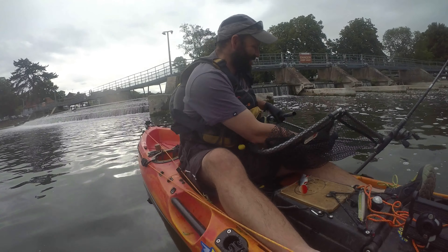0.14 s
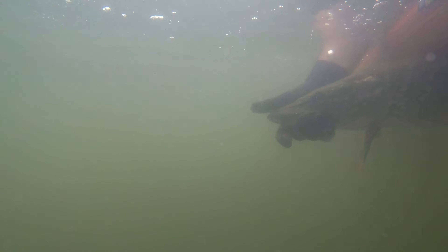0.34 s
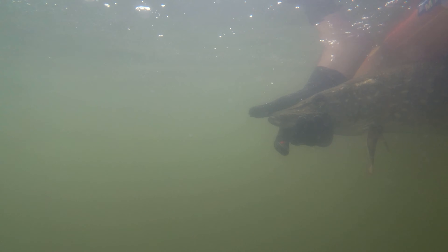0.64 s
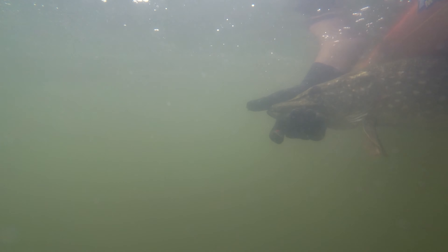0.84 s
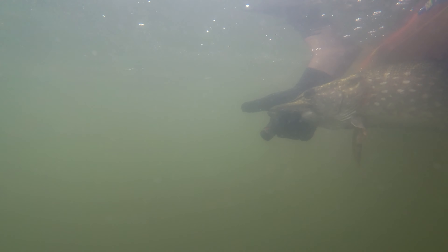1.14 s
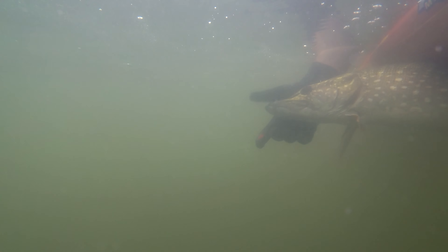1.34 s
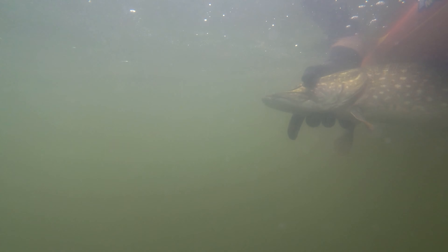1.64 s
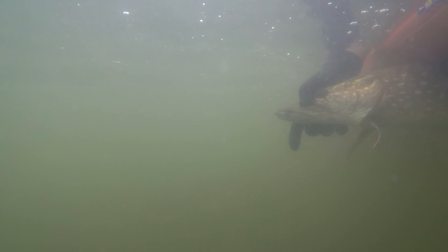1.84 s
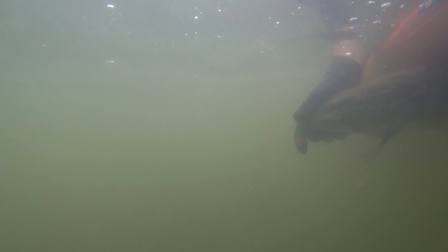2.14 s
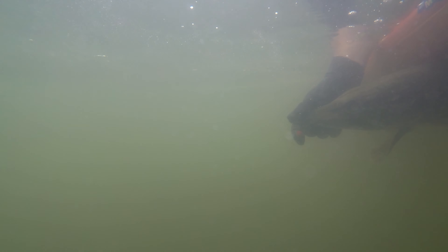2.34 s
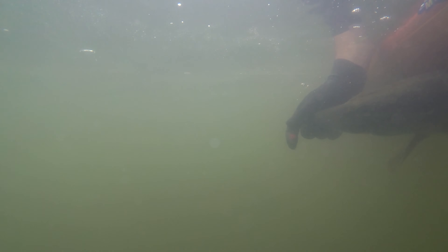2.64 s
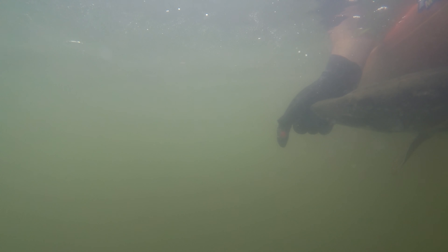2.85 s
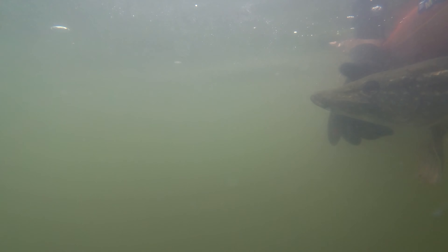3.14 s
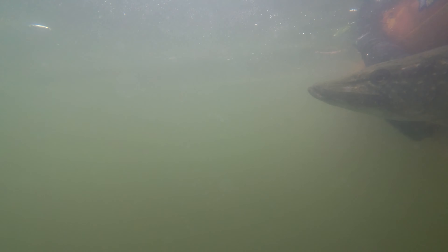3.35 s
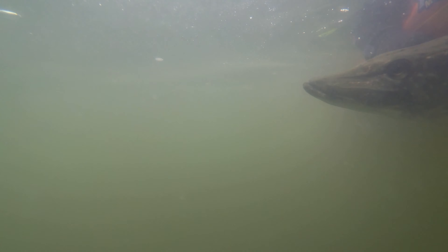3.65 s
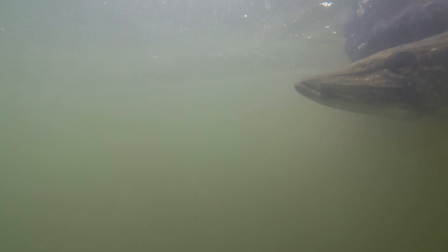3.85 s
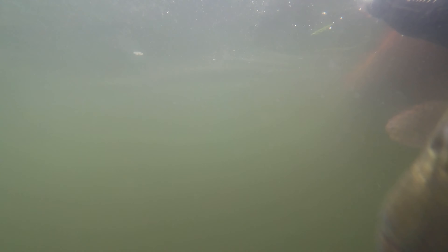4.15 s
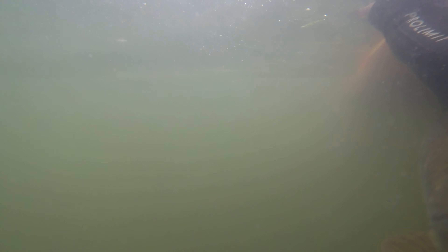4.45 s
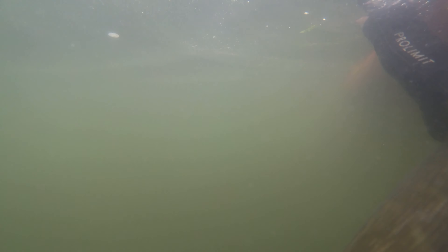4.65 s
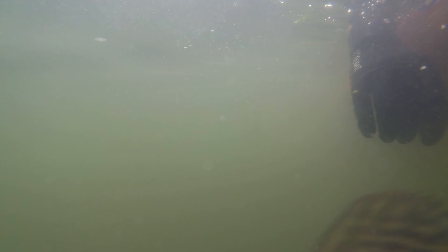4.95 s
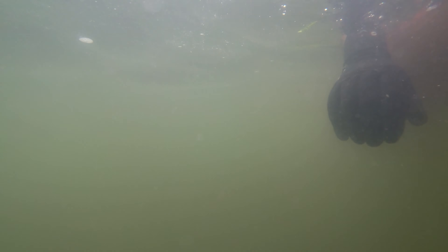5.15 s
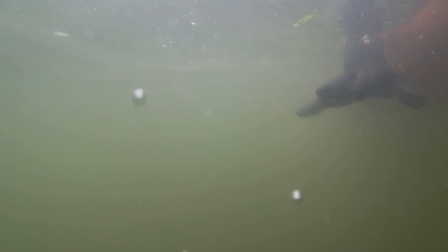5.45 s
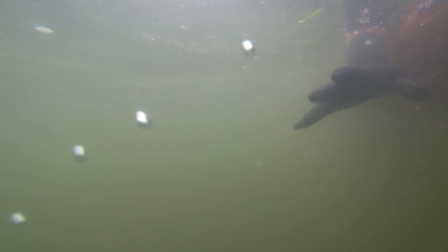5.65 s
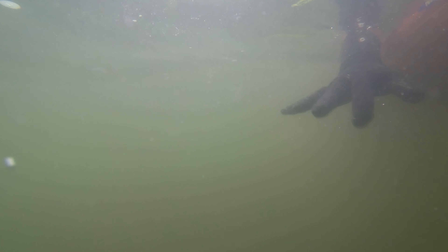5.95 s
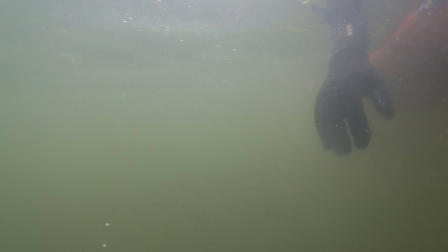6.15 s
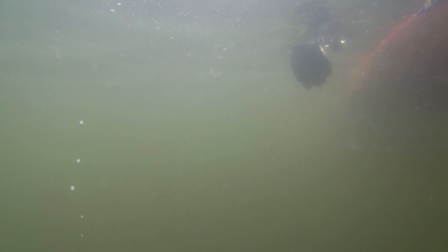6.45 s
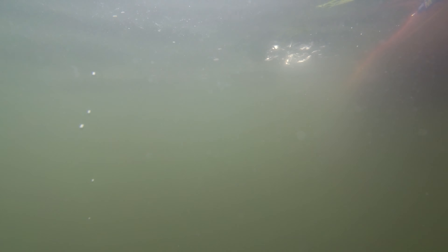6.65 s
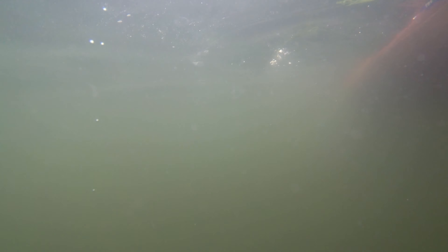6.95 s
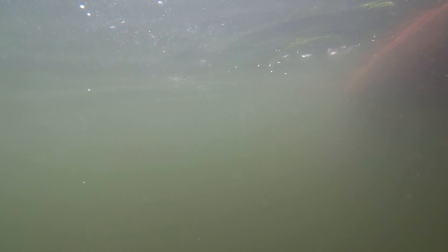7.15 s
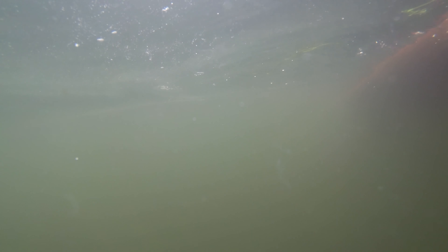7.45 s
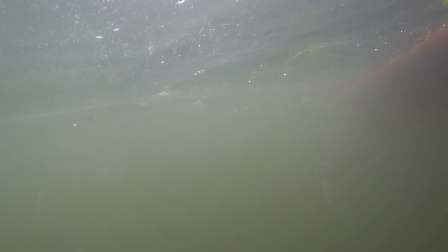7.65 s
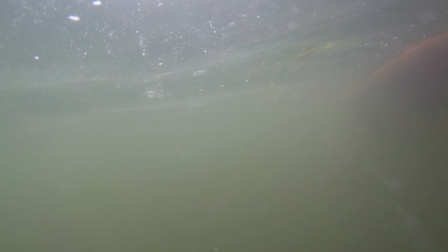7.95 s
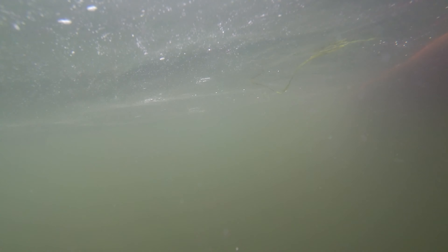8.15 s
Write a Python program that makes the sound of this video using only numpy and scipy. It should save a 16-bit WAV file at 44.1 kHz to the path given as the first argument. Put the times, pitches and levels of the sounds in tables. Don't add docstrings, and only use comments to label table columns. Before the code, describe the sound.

From 0 to 0.3 seconds, a distant weir makes a steady, slightly wavering rush in open air. A hard cut drops underwater beside a kayak, into muffled low rumble and a hollow hum around 500 hertz, with almost no treble. Deep thumps near 50 hertz hit at about 0.7, 1.0 and 1.2 seconds; gurgles and hollow ringing air follow at 1.3 to 1.6. After a quieter stretch, heavy thuds and hull knocks crowd 3.3 to 5.6, strongest near 3.6 and 4.4, overloading the microphone. A bright tick sounds at 4.8, and a very loud hollow bloop with falling gurgle at 5.4. Small laps and faint bubble ticks occupy 5.7 to 6.6. Another cluster of bumps and gurgles comes at 6.7 to 7.5, then light hollow taps over the muffled flow until it stops abruptly at 8.3.

```python
import sys
import numpy as np
from scipy import signal
from scipy.fft import rfft, irfft
from scipy.io import wavfile
from scipy.ndimage import uniform_filter1d

SR = 44100
rng = np.random.default_rng(int(sys.argv[2]) if len(sys.argv) > 2 else 0)


def natural_amplitude(level_db):
    exponent = np.asarray(level_db, float) / 20
    return 10 ** exponent


def master_out(mix):
    frames = np.transpose(np.atleast_2d(mix))
    ceiling = np.clip(frames, -1, 1)
    pcm = np.round(ceiling * 32767).astype(np.int16)
    wavfile.write(sys.argv[1], SR, pcm)


N = 365456
DIVE_S, END_S = 0.3102, 8.287

# [f/Hz, density/dB]
WEIR_SPECTRUM = [(12, -68), (20, -21.5), (104, -1), (145, -10), (239, -7.5), (374, -9), (418, -8),
                 (618, -9), (3030, -33.5), (4000, -29.5), (8030, -54), (9500, -47.5), (15700, -73)]
# [f/Hz, width/Hz, lift/dB]
PORT_MODES = [(4020, 250, 8), (9140, 830, 8)]
# [f/Hz, density/dB]
WATER_SPECTRUM = [(12, -44.5), (20, -12), (66, -14), (268, -13.5), (442, -7.5), (508, -4.5), (618, -8.5),
                  (672, -13), (772, -22.5), (1050, -26), (1170, -39.5), (1730, -49), (3110, -83),
                  (10900, -79), (15700, -94)]
# [f/Hz, width/Hz, lift/dB]
HOUSING_MODES = [(522, 83, 8), (669, 24, 6), (1054, 74, 6.5), (1305, 33, 7.5), (1850, 310, 6.5)]
# [t/s, level/dB]
FLOW_STRENGTH = [(0.32, -29.5), (0.5, -30.5), (1.25, -30.5), (1.47, -27.5), (1.96, -32.5), (2.38, -28.5),
                 (3.09, -32), (3.64, -30.5), (4.06, -29), (4.22, -25.5), (4.44, -30.5), (5.88, -29),
                 (6.42, -31.5), (6.99, -26), (7.19, -27.5), (8.28, -28)]
FLOW_EDGES_HZ = [125, 420, 800, 1160]
# [level over the flow/dB, share of its changes/1, churn/dB, ducking/dB]
FLOW_BANDS = [
    (-4.5, .5, 40, 10),
    (-3, 1, 6.5, 14),
    (-1.5, 0.8, 5.6, 16),
    (-18.5, 1.3, 13, 26),
]
# [t/s, peak level/dB, f/Hz, t60/s]
PLINKS = [
    (4.5955, -68, 4710, 0.015),
    (4.8743, -68.5, 4570, 0.015),
    (4.9907, -54.5, 4590, 0.015),
    (6.2123, -58, 4600, 0.015),
    (6.797, -59, 4740, 0.012),
]
# [t/s, peak level/dB, f/Hz, t60/s, brightness/dB]
TICKS = [
    (0.623, -28.5, 905, 0.037, -34),
    (1.39, -34.5, 1042, 0.095, -38),
    (4.836, -17.5, 1055, 0.044, -9.5),
    (6.213, -37, 1060, 0.037, -21),
    (6.291, -28, 1044, 0.033, -13),
    (7.358, -29.5, 1263, 0.04, -31),
    (8.169, -31.5, 875, 0.028, -14.5),
]
# [t/s, peak level/dB, start f/Hz, end f/Hz, t60/s]
GURGLES = [(1.332, -16, 398, 250, 0.066), (1.34, -20, 156.5, 150, 0.068), (1.345, -17.5, 278, 256.5, 0.16),
           (1.404, -15, 252.7, 200.5, 0.13), (1.421, -23.5, 862, 792, 0.045),
           (1.44, -19.5, 192.2, 200.6, 0.45), (1.49, -16, 330, 300, 0.04), (1.575, -29, 920, 915, 0.091),
           (3.364, -33, 950, 960, 0.039), (3.55, -24, 707, 684, 0.17), (5.37, -9, 419.3, 162.3, 0.15),
           (5.385, -12, 302.6, 207.7, .1), (6.80, -20.5, 227, 168, 0.22), (6.88, -23.5, 300, 258, 0.11),
           (7.02, -16.5, 160, 187, 0.3), (7.045, -27, 720, 690, 0.33), (7.10, -23, 696, 647, 0.092),
           (7.325, -29, 1046, 1060, 0.21), (7.354, -33, 1188, 1280, 0.068), (7.41, -25, 804, 765, 0.061)]
# [t/s, peak level/dB, f/Hz]
RINGS = [(1.39, -16, 566), (1.596, -16, 670), (2.785, -20, 540), (4.019, -15.5, 560), (4.086, -12.5, 532),
         (4.147, -17.5, 543), (4.595, -17.5, 535), (4.83, -12, 478), (5.363, 1.8, 469), (5.379, -6, 535),
         (5.59, -17, 566), (5.823, -21, 522), (6.862, -11.5, 592), (7.359, -20, 520), (7.631, -12, 522),
         (7.686, -20.5, 537), (7.759, -15, 518), (8.201, -14.5, 547)]
# [t/s, peak level/dB, f/Hz]
SHORT_RINGS = [(0.493, -15, 471), (0.577, -15, 528), (1.569, -14, 620), (2.011, -22, 520),
               (4.216, -21.5, 510), (5.356, -7.5, 500), (6.292, -11.5, 604), (6.72, -9.5, 549),
               (7.105, -8, 419), (7.718, -23.5, 424), (8.019, -15, 505)]
# [t/s, peak level/dB, f/Hz]
LONG_RINGS = [
    (1.492, -9.5, 552),
    (1.768, -21.5, 663),
    (3.189, -18, 547),
]
# [t/s, peak level/dB, f/Hz, t60/s]
KNOCKS = [(1.025, -21.5, 151.8, 0.086), (3.358, -12, 125.3, 0.08), (3.586, 1, 242.4, 0.07),
          (3.837, -19, 176, 0.07), (4.022, -24.5, 420, 0.07), (4.057, -21.5, 232, 0.054),
          (4.268, -7.5, 267.8, 0.064), (4.383, 0, 244.8, 0.07), (4.68, -22, 215.7, 0.064),
          (4.914, -9, 251.8, 0.078), (5.316, -3.5, 267, 0.052), (6.722, -16.5, 178.6, 0.12),
          (7.079, -9.5, 181, 0.036), (7.104, -10, 245, 0.035), (7.14, -13.5, 151.7, 0.08)]
# [t/s, peak level/dB, f/Hz]
MORE_SURGES = [(0.463, -23, 67.8), (1.381, -23.5, 69.5), (1.43, -22.5, 56.4), (2.121, -15.5, 44.3),
               (2.886, -27.5, 62.4), (3.52, -19.5, 52.1), (3.709, -23, 54.3), (3.977, -15, 63.2),
               (4.309, -17.5, 70.9), (4.768, -36.5, 54.7), (4.852, -18.5, 55), (5.749, -20.5, 44.6),
               (6.064, -18.5, 65.7), (6.207, -20, 48.4), (6.399, -23.5, 70.4), (6.729, -14, 72.7),
               (6.768, -19, 69.9), (6.819, -14, 57.4), (7.008, -18, 67), (7.279, -17, 61), (7.328, -16.5, 46.7),
               (7.388, -22.5, 64.4), (7.909, -16.5, 62.8)]
# [t/s, peak level/dB, f/Hz, length of the push/s, swings until died away/1]
SURGES = [(0.666, -3, 54.7, 0.011, 8.3), (1.023, 3, 53.86, 0.01, 10), (1.233, -2.5, 51, 0.018, 7),
          (1.556, -15.5, 44.6, 0.012, 9.5), (1.813, -8.5, 50.8, 0.024, 8.5),
          (3.039, -13.5, 46.4, 0.01, 8.5), (3.359, 0, 46.15, 0.015, 7.5), (3.601, 4.5, 46.2, 0.017, 3.8),
          (3.841, -1, 46.4, 0.015, 8.5), (4.104, -13.5, 48.2, 0.014, 9.8),
          (4.251, -13.5, 46.35, 0.015, 8.1), (4.406, 3.5, 46.53, 0.015, 8), (4.67, -5.5, 55.4, 0.0068, 6.5),
          (4.943, -2.5, 50.7, 0.0073, 8.2), (5.03, -11.5, 55, 0.0087, 6.5), (5.115, -3, 54.65, 0.0064, 6),
          (5.293, -9.5, 44.95, 0.0096, 12), (5.586, -4.5, 46.7, 0.0099, 9), (6.883, -12.5, 54.9, 0.01, 10),
          (6.943, -15, 60.6, 0.015, 13), (7.073, -8.5, 54, 0.0072, 10), (7.123, -4.5, 49.8, 0.006, 8),
          (7.448, -16.5, 48.4, 0.014, 12)]
IMAGES_DB = [-61, -67.5, -69.5, -72]


def colour(x, points, modes):
    hz = np.maximum(np.fft.rfftfreq(len(x), 1 / SR), 1)
    points_hz, points_db = np.transpose(points)
    db = np.interp(np.log(hz), np.log(points_hz), points_db)
    for centre, width, lift_db in modes:
        db = db + lift_db / (1 + (2 * (hz - centre) / width) ** 2)
    y = irfft(rfft(x) * natural_amplitude(db), len(x))
    return y / y.std()


def split(x, edges):
    hz = np.fft.rfftfreq(len(x), 1 / SR)
    below = [0] + [1 / (1 + (hz / e) ** 10) for e in edges] + [1]
    spectrum = rfft(x)
    bands = [irfft(spectrum * (b - a), len(x)) for a, b in zip(below, below[1:])]
    return [b / b.std() for b in bands]


def walk(rate):
    hold = int(SR / rate)
    steps = np.repeat(rng.standard_normal(N // hold + 1), hold)
    return 1.34 * uniform_filter1d(uniform_filter1d(steps, hold), hold)[:N]


def add(out, s, db, hz, end_hz, t60, rise, chance):
    t = np.arange(int(min(t60, 0.45) * SR)) / SR
    turns = np.cumsum(end_hz + (hz - end_hz) * np.exp(-5.5 * t / t60)) / SR
    partner = 1.25 + 0.039 * chance[1]
    swing = np.sin(2 * np.pi * turns) + 0.15 * np.sin(2 * np.pi * turns * partner)
    swing *= (1 - np.exp(-t / rise)) ** 2 * np.exp(-np.log(1000) * t / t60)
    start = int(s * SR)
    swing = swing[:N - start]
    out[start:start + len(swing)] += np.sign(chance[0]) * natural_amplitude(db) * swing / np.abs(swing).max()


def blows(s, db, hz, end_hz, t60, rise):
    out = np.zeros(N)
    chances = rng.standard_normal((len(s), 2))
    rows = zip(*np.broadcast_arrays(s, db, hz, end_hz, np.maximum(t60, 0.008), rise))
    for row, chance in zip(rows, chances):
        add(out, *row, chance)
    return out


def weir():
    level = natural_amplitude(-29 + 0.69 * walk(16))
    return level * colour(rng.standard_normal(N), WEIR_SPECTRUM, PORT_MODES)


def flow(blown):
    s, db = np.transpose(FLOW_STRENGTH)
    change = np.interp(np.arange(N) / SR, s, db) - db.mean()
    force = np.abs(blown)
    churn = uniform_filter1d(force, int(0.1 * SR))
    keep = np.exp(-1 / (0.046 * SR))
    duck = np.roll(signal.lfilter([1 - keep], [1, -keep], force), int(0.081 * SR))
    eddies = rng.standard_normal(N) * natural_amplitude(1.5 * walk(90))
    *bands, fizz = split(colour(eddies, WATER_SPECTRUM, HOUSING_MODES), FLOW_EDGES_HZ)
    swell = 0.6 * walk(3)
    flicker_db = [2.3, 1.6, 1.9, 2.2]
    out = natural_amplitude(-61.5) * fizz
    for band, (up_db, share, churn_db, duck_db), flicker in zip(bands, FLOW_BANDS, flicker_db):
        level_db = db.mean() + up_db + share * change + swell + flicker * walk(12)
        out += band * natural_amplitude(level_db + churn_db * churn - duck_db * duck)
    return out


def plinks():
    s, db, hz, t60 = np.transpose(PLINKS)
    return blows(s, db - 1.0, hz, 1.04 * hz, t60, rise=0.0014)


def ticks():
    s, db, hz, t60, bright_db = np.transpose(TICKS)
    snap = blows(s - 0.001, db + bright_db, 1400.0, 1900.0, 0.3 * t60, rise=0.0012)
    ring = blows(s - 0.001, db - 1.5, hz, hz, t60, rise=0.00046)
    return ring + snap


def bubbles():
    kinds = (RINGS, 0.065), (SHORT_RINGS, 0.031), (LONG_RINGS, 0.17)
    rows = sorted((*row, t60) for table, t60 in kinds for row in table)
    s, db, hz, t60 = np.transpose(rows)
    rings = blows(s - 0.0012, db - 2.5, hz, 1.01 * hz, t60, rise=0.001)
    return rings + blows(*np.transpose(GURGLES), rise=0.0025)


def knocks():
    s, db, hz, t60 = np.transpose(KNOCKS)
    panel = blows(s - 0.001, db - 0.5, 1.03 * hz, 0.96 * hz, 0.7 * t60, rise=0.0035)
    hull = blows(s, db - 10.5, 150.0, 120.0, t60, rise=0.0041)
    return panel + hull


def thumps():
    more_surges = [(*row, 0.012, 12) for row in MORE_SURGES]  # push/s, swings
    s, db, hz, push, cycles = np.transpose(sorted([tuple(row) for row in SURGES] + more_surges))
    slap = blows(s - 0.002, db - 15, 125.0, 70.0, 0.065, rise=0.0062)
    sway = blows(s + 0.046, db - 23.5, 1.08 * hz, 1.08 * hz, 0.57, rise=0.018)
    push = np.maximum(push, 0.003)
    swing = blows(s + 0.0013, db - 0.78, 0.97 * hz, 1.1 * hz, cycles / hz, push)
    return swing + slap + sway


def scene():
    wall = signal.butter(12, 2000, fs=SR, output="sos")
    blown = signal.sosfilt(wall, thumps() + knocks() + bubbles() + ticks())
    under = flow(blown) + blown + plinks()
    return np.where(np.arange(N) < DIVE_S * SR, weir(), under)[None]


def low_pass(x):
    return signal.sosfilt(signal.butter(12, 15840, fs=SR, output="sos"), x)


def record(dry):
    t = np.arange(N) / SR
    hiss = natural_amplitude(-92) * signal.lfilter([1, 2, 1], [1, -0.7], rng.standard_normal(N))
    x = np.clip(dry, -1, 1) + hiss
    beat_hz = 48000 - SR
    ripple = sum(natural_amplitude(db) * np.cos(2 * np.pi * (k + 1) * beat_hz * t) for k, db in enumerate(IMAGES_DB))
    grit = natural_amplitude(-72) * signal.lfilter([1, 1], [1, -0.3], rng.standard_normal(N))
    x = x + np.where(t > DIVE_S, x * (ripple + grit), 0)
    return low_pass(x * (t < END_S))


dry = scene()
out = record(dry)
master_out(out)
```